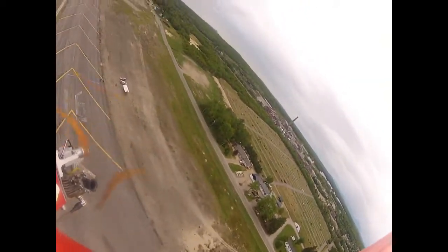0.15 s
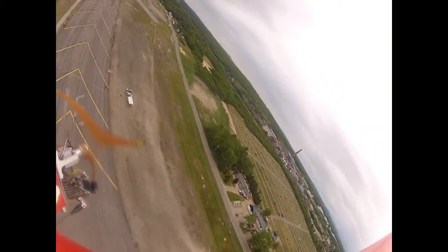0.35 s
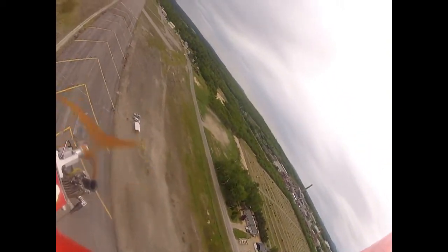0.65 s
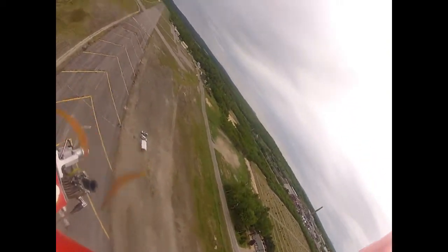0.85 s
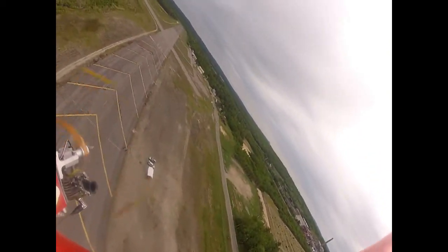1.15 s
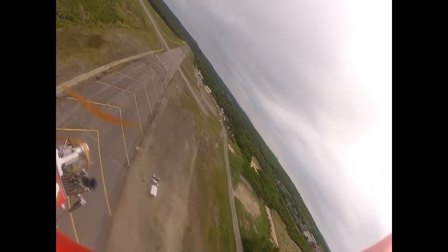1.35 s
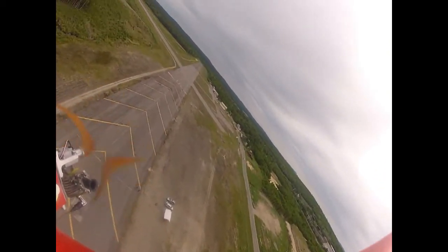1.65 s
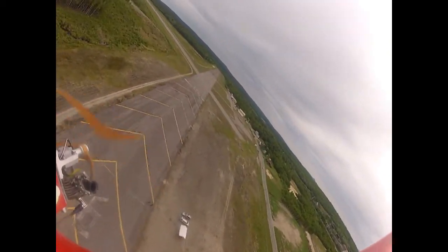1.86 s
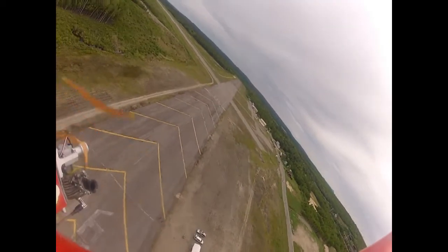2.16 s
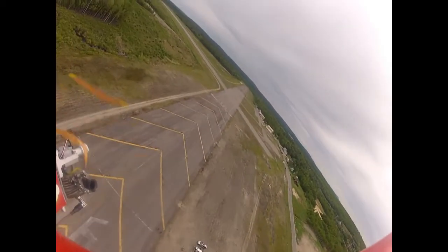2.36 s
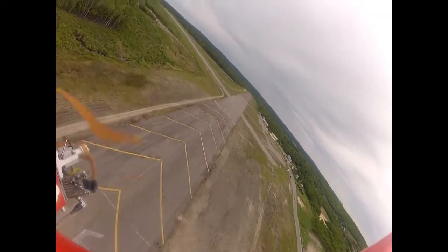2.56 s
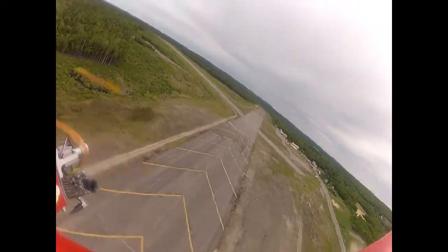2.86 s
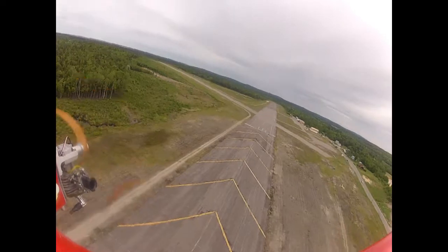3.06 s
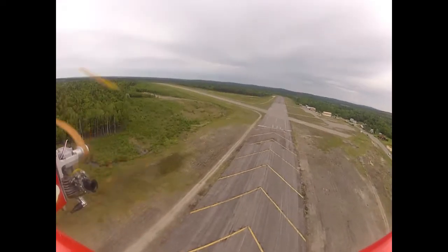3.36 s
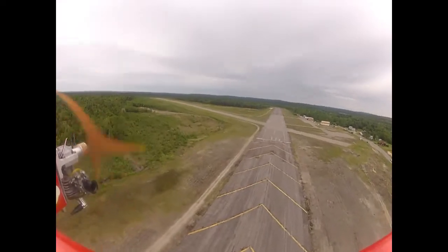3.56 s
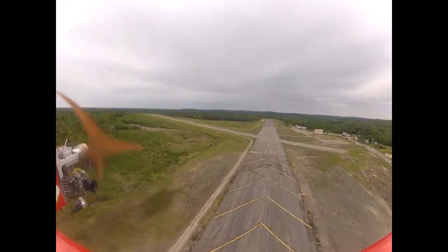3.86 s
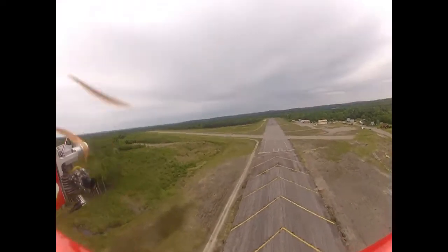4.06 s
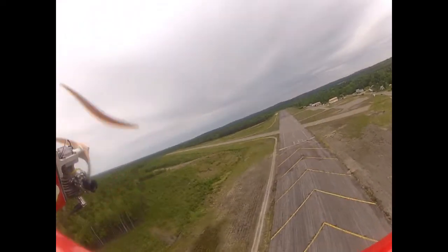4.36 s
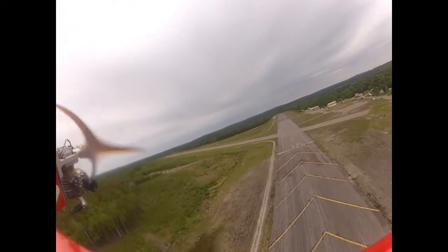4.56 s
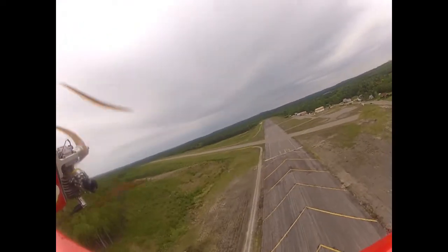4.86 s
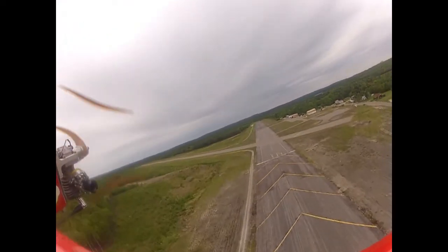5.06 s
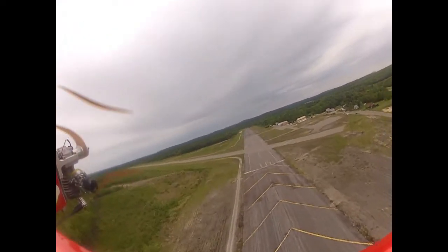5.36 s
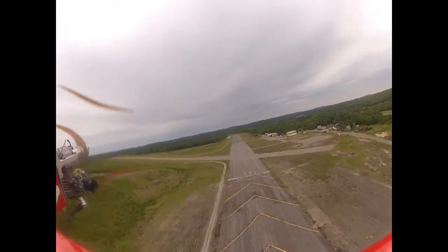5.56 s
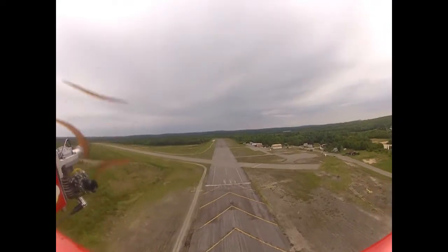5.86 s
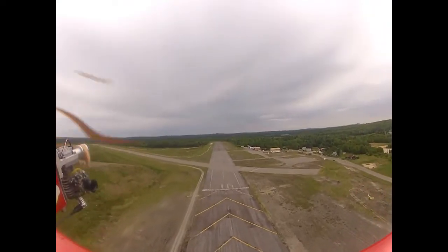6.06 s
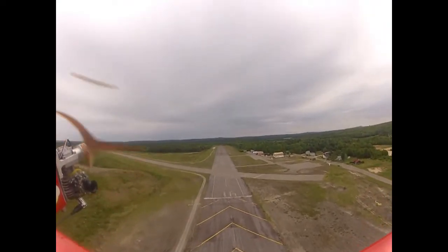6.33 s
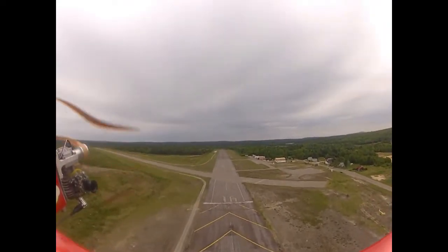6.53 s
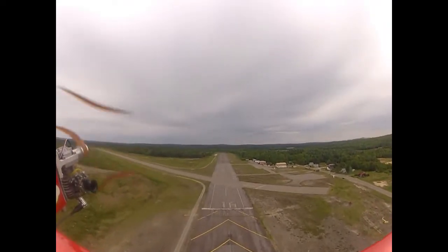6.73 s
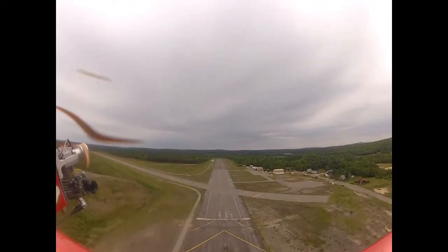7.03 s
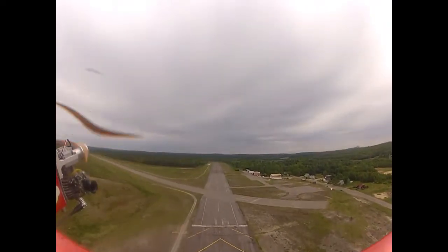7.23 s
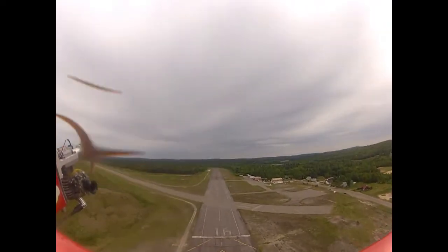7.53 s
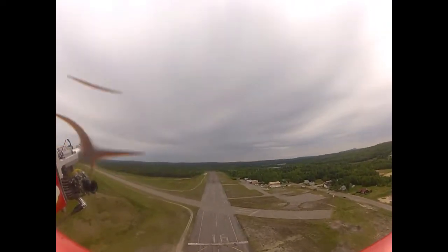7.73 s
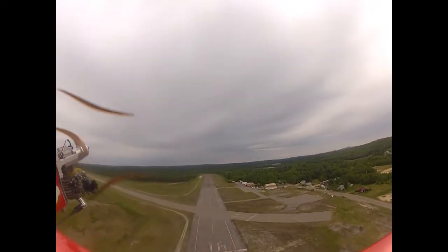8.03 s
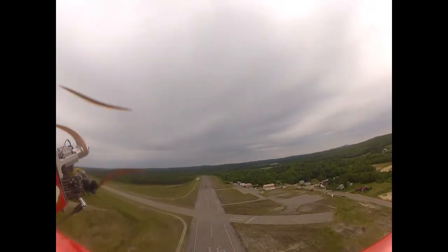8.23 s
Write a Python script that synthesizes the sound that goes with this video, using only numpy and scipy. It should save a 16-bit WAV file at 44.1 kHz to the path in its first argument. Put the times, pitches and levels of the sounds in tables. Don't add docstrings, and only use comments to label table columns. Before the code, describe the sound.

Close onboard sound from a small aircraft in flight. A two-stroke engine putters in rapid, slightly stumbling thuds with a ringing metallic body, under hissing and rumbling wind. A few small taps hit the camera housing. After four and a half seconds the throttle opens, the engine shudders and climbs quickly, then holds a steady buzzing drone. The microphone sounds cramped, clipped and gritty.

```python
import sys
import numpy as np
from scipy import signal
from scipy.io import wavfile
from scipy.ndimage import uniform_filter1d

SR = 44100
rng = np.random.default_rng(int(sys.argv[2]) if len(sys.argv) > 2 else 0)


def boost_factor(decibels):
    exponent = np.asarray(decibels, float) / 20
    return 10 ** exponent


def dump(signal):
    limited = np.clip(np.atleast_2d(signal).T, -1, 1)
    pcm = np.round(limited * 32767).astype(np.int16)
    wavfile.write(sys.argv[1], SR, pcm)


N = 369999
T = np.arange(N) / SR


def curve(rows, column):
    rows = np.asarray(rows, float)
    return np.interp(T, rows[:, 0], rows[:, column])


def read(points, hz):
    f, level_db = np.transpose(points)
    return np.interp(np.log(hz + 1), np.log(f + 1), level_db)


def evened(x):
    return x / np.sqrt(np.mean(x ** 2) + 1e-20)


def wander(hz):
    steps = rng.standard_normal(N // 64 + 2)
    steps = signal.sosfiltfilt(signal.butter(2, hz, fs=SR / 64, output="sos"), steps)
    return np.interp(np.arange(N) / 64, np.arange(len(steps)), evened(steps))


def noise(field_db, patchy_db, size):
    frames, hz = 4 * N // size + 5, np.fft.rfftfreq(size, 1 / SR)
    real, imaginary, patches = rng.standard_normal((frames, len(hz), 3)).T
    patches = uniform_filter1d(patches, size=10, axis=0)
    patches = evened(uniform_filter1d(patches, size=10, axis=1))
    at = np.minimum(np.arange(frames) * size // 4, N - 1)
    spectra = (real + 1j * imaginary) * boost_factor(field_db(hz[:, None], at) + patchy_db * patches)
    sound = signal.istft(spectra, nperseg=size, noverlap=3 * size // 4)[1]
    return evened(sound[:N])


def slipstream(turns, clicks):
    # (time [s], hiss level [dB])
    wind = [(0.0, -30.5), (1.3, -32.5), (2.66, -32.5), (4.49, -35), (4.67, -36.5), (4.79, -34), (4.95, -34),
            (5.07, -38), (5.28, -33.5), (5.42, -36.5), (6.9, -35.5), (8.39, -35.5)]
    # (frequency [Hz], level [dB per Hz])
    housing = [(450, -4.5), (620, -7.5), (850, -11.5), (960, -0.5), (1250, -9), (1600, -13.5), (1790, -3),
               (2100, -8), (2480, -5.5), (3000, -21.5), (3620, -13), (4100, -27), (5100, -24.5),
               (6300, -41.5)]
    # (frequency [Hz], gain [dB])
    opened_colour = [(500, -2.5), (1000, -3), (1900, -2), (2500, -5.5), (3100, 4.5), (3700, 2), (4200, 6),
                     (4800, -1), (5350, 6.5), (5900, 7.5)]
    # (frequency [Hz], level [dB per Hz])
    idle_rumble = [(20, -18), (60, 3), (120, 1), (200, 2), (330, 3.5), (450, 1.5), (600, -18.5), (900, -43)]
    # (frequency [Hz], level [dB per Hz])
    buffet = [(20, -11), (55, 0.5), (95, -11.5), (185, -3), (225, -6.5), (335, 2), (450, -5.5), (600, -11),
              (900, -23)]

    t = np.arange(1300) / SR
    puff = signal.oaconvolve(clicks, np.exp(-((t - .008) / 0.013) ** 2))[:N]
    throttle = np.clip((T - 4.6) / .5, 0, 1)
    opened = np.clip((T - 4.37) / .7, 0, 1)
    wind_db = curve(wind, column=1)

    lower_idle_db = 1.5 - 1.42 * (wind_db - wind[0][1])
    lower_db = lower_idle_db * (1 - throttle) + 4.5 * throttle + wander(hz=7.7)

    idle_db, open_db, lumps_db, rise_db_per_s = -31, -33.5, 1.2, 1.1
    shake_db = idle_db + (open_db - idle_db) * throttle
    shake_db = shake_db + lumps_db * (1 - .7 * throttle) * wander(hz=12)
    shake_db = shake_db + rise_db_per_s * throttle * (T - 6.5)
    shake_db = shake_db + 8 * np.exp(-((T - 4.68) / 0.2) ** 2)

    rasp_db = 2 * np.exp(-((T - 5.0) / .25) ** 2)
    gusts_db = 2.5 * puff + (0.5 * throttle + rasp_db) * np.cos(2 * np.pi * turns)
    gusts_db = gusts_db + 0.34 * wander(hz=154) + 0.61 * wander(hz=39)

    def hiss_db(hz, at):
        top_db = -40 * np.clip(np.log2(hz / 6300 + 1e-9), 0, 2)
        bottom_db = -30 * np.clip(np.log2(450 / (hz + 1)), 0, 2)
        lower = np.clip((1650 - hz) / 200, 0, 1) * (lower_db[at] - 3.5)
        return read(housing, hz) + read(opened_colour, hz) * opened[at] + lower + top_db + bottom_db

    def rumble_db(hz, at):
        blend_db = read(idle_rumble, hz) * (1 - throttle[at]) + read(buffet, hz) * throttle[at]
        return blend_db - 40 * (hz > 900) - 40 * (hz < 18)

    hiss = boost_factor(wind_db + 6 + gusts_db) * noise(hiss_db, patchy_db=0.0, size=1024)
    rumble = noise(rumble_db, patchy_db=1.0, size=4096)
    return hiss + boost_factor(shake_db + 4.1 * puff) * rumble


def taps():
    # (time [s], peak level [dB], pitch [Hz], ring time [ms])
    blows = [
        (1.166, -41, 1330, 4.6),
        (1.908, -21, 1825, 4.3),
        (2.003, -22, 1130, 4.9),
        (3.362, -40, 1000, 3.4),
        (3.447, -19.5, 2120, 3),
        (1.9, -30, 2980, 0.73),
    ]
    out, t = np.zeros(N), np.arange(1500) / SR
    for s, db, hz, ring_ms in blows:
        u = 1000 * t / ring_ms
        swell = np.e * u * np.exp(-u)
        out[round(s * SR):][:len(t)] += boost_factor(db) * swell * np.sin(2 * np.pi * hz * t)
    crack_s, crack_db = 3.288, -27.5
    crack = rng.standard_normal(len(t)) * np.exp(-t / .002)
    out[round(crack_s * SR):][:len(t)] += boost_factor(crack_db) * crack
    return out


def shaft_hz():
    # (time [s], turns a second [Hz])
    speeds = [(0.0, 80.11), (1.37, 80.7), (1.85, 82.37), (2.27, 79.97), (3.02, 78.33), (4.27, 78.07),
              (4.55, 78.4), (4.67, 98.5), (4.76, 110), (5.09, 113.4), (5.2, 121.3), (5.54, 129.8),
              (5.85, 130.9), (6.3, 130), (6.72, 131), (7.05, 129.3), (7.3, 130.1), (8.39, 129.7)]
    return curve(speeds, column=1)


def shaft_turns():
    first_turn = .675
    return first_turn + np.cumsum(shaft_hz() * (1 + 0.0018 * wander(hz=10.3))) / SR


def firings(turns):
    # (time [s], pause to the next firing [turns])
    stumbles = [(.019, 2), (.043, 2), (.068, 2), (.092, 2), (.716, 2), (.741, 2), (.951, 2), (.976, 2),
                (1.0, 2), (1.803, 2), (1.864, 2), (2.978, 2), (3.272, 4), (3.897, 4), (4.524, 2), (4.55, 2),
                (4.575, 2)]
    last_kick_s = 4.625
    passes = np.flatnonzero(np.diff(np.floor(turns)))
    when, pause = np.transpose(stumbles)
    clicks, waited = np.zeros(N), np.zeros(N)
    sizes = rng.standard_normal(len(passes))
    k, step = 1, 2
    while T[passes[k]] < last_kick_s:
        clicks[passes[k]] = boost_factor(.4 * sizes[k])
        waited[passes[k]] = step
        near = abs(when - T[passes[k]]) < .011
        step = int(pause[near][0]) if near.any() else 3
        k += step
    return clicks, waited


def drone(turns):
    # (multiple [turns], level [dB])
    labouring = [(1, -8), (2, -2), (3, 0), (4, -8.5), (5, -17), (6, -13.5), (7, -24), (8, -17), (9, -26),
                 (10, -17), (11, -29), (12, -49), (13, -22), (14, -24), (15, -22), (16, -20), (17, -21),
                 (18, -30), (19, -20.5), (20, -19), (21, -32), (22, -37), (23, -36), (24, -22)]
    # (multiple [turns], level [dB])
    climbing = [(1, -16), (2, -13), (3, 0), (4, -22), (5, -16), (6, -25), (7, -13.5), (8, -39), (9, -12.5),
                (10, -24), (11, -33), (12, -22), (13, -29), (14, -50), (15, -22), (16, -46), (17, -25),
                (18, -25), (19, -33), (20, -29), (21, -26.5), (22, -27), (23, -32), (24, -35)]
    # (multiple [turns], level [dB])
    running_free = [(1, -17), (2, -12), (3, 0), (4, -24.5), (5, -24.5), (6, -16), (7, -29), (8, -17),
                    (9, -19), (10, -22), (11, -25), (12, -32.5), (13, -23.5), (14, -20), (15, -18.5),
                    (16, -22), (17, -26), (18, -68), (19, -38), (20, -27), (21, -64), (22, -29.5),
                    (23, -37), (24, -39)]
    # (shaft speed [Hz], order 1 [dB], order 2 [dB], order 3 [dB])
    run_up = [(78, -17, -15, -31), (85, -13, -24, -25), (94, -23, -27, -17), (103, -30, -34, -19.5),
              (111, -25, -39, -17.5), (111.2, -27.5, -24, -15), (112.6, -27.5, -23.5, -18),
              (118, -31, -24.5, -16), (120.4, -30, -32, -16.5), (126, -36, -31, -17.5),
              (122.2, -26, -28, -17.5), (128.4, -35.5, -29.5, -17)]
    # (shaft speed [Hz], phase [radians])
    mount_lag = [(111, .4), (112.5, 1.15), (116, 1.15), (126, .45)]
    # (frequency [Hz], width [Hz])
    turnovers = [(1105, 30), (1640, 120)]
    # (time [s], width [s], orders 1 and 2 [dB], order 3 [dB])
    falters = [
        (4.8, .03, 1, 4),
        (4.98, .06, 3, -2.5),
        (5.18, .02, -7, -1.5),
        (5.27, 0.021, 1, 0),
        (5.33, 0.017, 6, .3),
        (5.4, 0.057, -10, -0.5),
    ]
    # (start [s], end [s], gain [dB])
    buzz_spells = [(4.86, 5.06, 4), (5.102, 5.498, 6), (5.517, 6.05, 2), (6.172, 6.547, 4),
                   (6.82, 7.1, 4.5), (7.13, 8.32, 4.5)]

    speed = shaft_hz()
    mount = np.interp(speed, *np.transpose(mount_lag))
    dip_db = sum(np.outer([db, db, third_db], np.exp(-((T - s) / width) ** 2))
                 for s, width, db, third_db in falters)
    stages = np.transpose(run_up)
    low = 0
    for k in range(1, 4):
        db = np.interp(speed, stages[0], stages[k]) + 4.5 + dip_db[k - 1]
        db = db + (k < 3) * 0.87 * wander(hz=8)
        low = low + boost_factor(db) * np.cos(2 * np.pi * k * turns - mount)

    rest_db, edge_s = -5, 0.087
    buzz_db = rest_db + sum(db * np.clip(np.minimum(T - start, end - T) / edge_s + .5, 0, 1)
                            for start, end, db in buzz_spells)
    upper = 0
    for (k, load_db), (_, climb_db), (_, free_db) in zip(labouring[3:], climbing[3:], running_free[3:]):
        share = np.clip((k - 8) / 5, .2, 1.6)
        db = np.interp(speed, [114, 123, 129], [load_db - 15.5, climb_db - 14.5, free_db - 15.0])
        db = db + share * buzz_db + 2.3 * wander(hz=4.4)
        lag = mount + sum(np.pi / 2 + np.arctan((k * speed - hz) / width) for hz, width in turnovers)
        upper = upper + boost_factor(db) * np.cos(2 * np.pi * k * turns - lag + 0.022 * k * wander(hz=24.5))

    low_on = np.clip((T - 4.555) / 0.1, 0, 1)
    upper_on = np.clip((speed - 104) / 8, 0, 1)
    return -low_on * low - upper_on * upper


def kicks(clicks, waited):
    # (delay [ms], width [ms], signed size [ratio])
    swings = [
        (0.4, 3.35, -0.24),
        (1.79, 8.6, -0.55),
        (10.28, 4, 0.7),
        (18.36, 5.34, -0.88),
        (23.5, 6, 0.2),
    ]
    # (frequency [Hz], level [dB], t60 [s])
    frame_modes = [(141, -14, 0.059), (207.5, -11, 0.11), (247.2, -10.5, 0.23), (284.8, -11, 0.23),
                   (336, -17.5, 0.88), (383, -23, 0.32), (399.6, -11.5, 0.16), (707.5, -17.5, 0.13)]
    # (time [s], level [dB])
    ringing = [(0, -27), (.2, -27.5), (1.1, -27.5), (1.5, -24.5), (2.2, -25), (3.0, -27.5), (3.5, -29.5),
               (4.45, -30), (4.63, -22.5)]

    lead = 400
    ms = (np.arange(9000) - lead) / SR * 1000
    rock = sum(size * np.cos(np.pi * np.clip((ms - at) / width, -.5, .5)) ** 2
               for at, width, size in swings)
    t = (ms - 8.5) / 1000
    ring = sum(boost_factor(db - 60 * t / t60) * np.cos(2 * np.pi * hz * t) for hz, db, t60 in frame_modes)
    ring = ring * np.clip(1 + t / 0.0076, 0, 1)

    off_turns = abs(waited - 3)
    swing_db = -16 - 3 * off_turns
    ring_db = curve(ringing, column=1) - 0.5 * off_turns
    swung = signal.oaconvolve(clicks * boost_factor(swing_db + 11), rock)
    rung = signal.oaconvolve(clicks * boost_factor(ring_db + 15.5), ring)

    swinging = signal.oaconvolve(clicks > 0, np.exp(-((ms - 9) / 15) ** 4))
    reach_db = 1.5 - 6.5 * (1 - np.minimum(swinging, 1))
    return (swung + rung * boost_factor(reach_db))[lead:][:N]


def scene():
    turns = shaft_turns()
    clicks, waited = firings(turns)
    engine = kicks(clicks, waited) + drone(turns)
    return (slipstream(turns, clicks) + taps() + engine)[None]


def low_pass(x):
    return signal.sosfilt(signal.butter(12, 15560, fs=SR, output="sos"), x)


def record(dry):
    slow_rate_hz, ceiling = 12000, .497
    cut = signal.sosfilt(signal.butter(1, 12, "high", fs=SR, output="sos"), dry)
    slow = signal.resample_poly(cut, 4 * slow_rate_hz, SR, axis=1)[:, ::4]
    held = np.repeat(np.clip(slow, -ceiling, ceiling), 4, axis=1)
    out = signal.resample_poly(held, SR, 4 * slow_rate_hz, axis=1)[:, :N]
    out = np.pad(out, ((0, 0), (0, N - out.shape[1])))
    lowpass = signal.firwin(301, 15500, window=("kaiser", 8), fs=SR)
    out = signal.oaconvolve(out, lowpass[None], "same")
    return low_pass(out)


dry = scene()
out = record(dry)
dump(out)
```